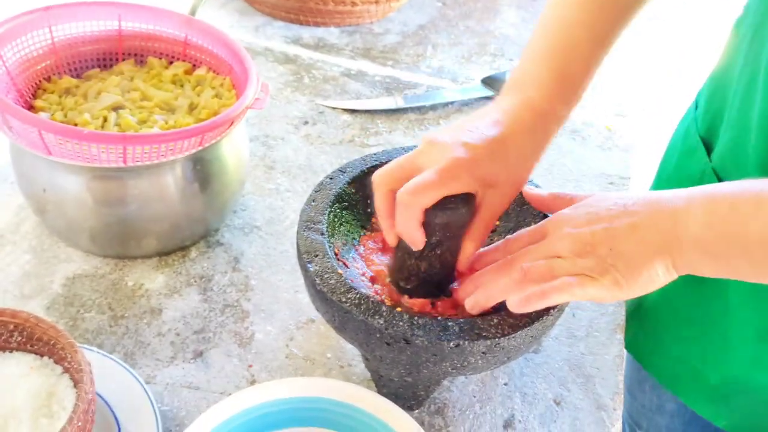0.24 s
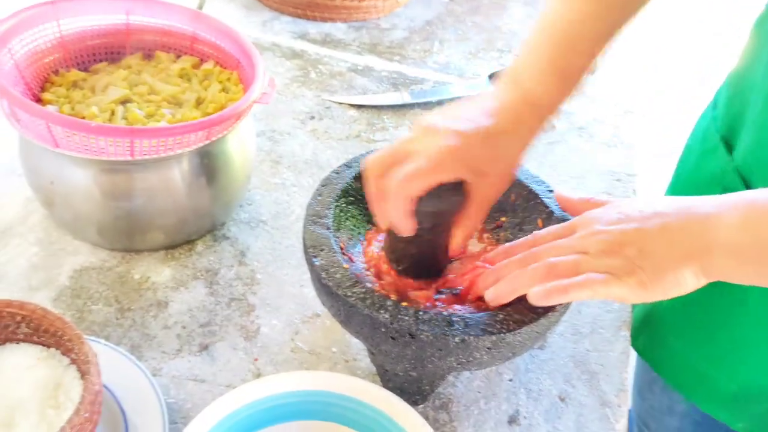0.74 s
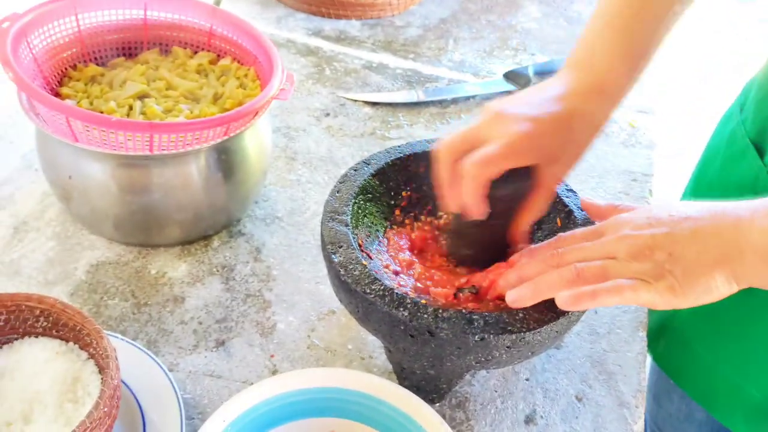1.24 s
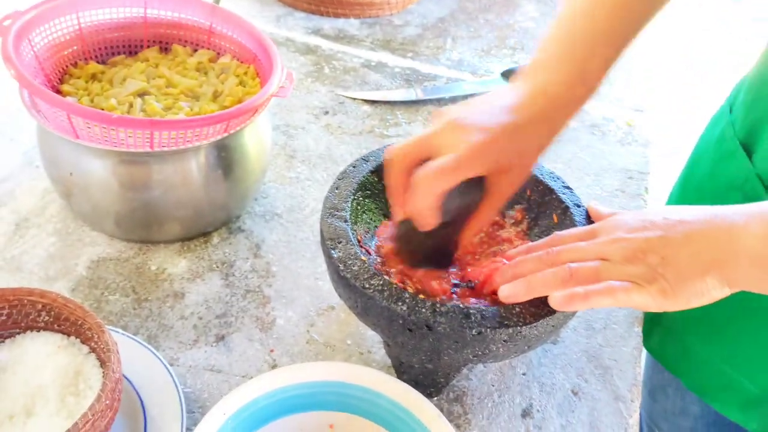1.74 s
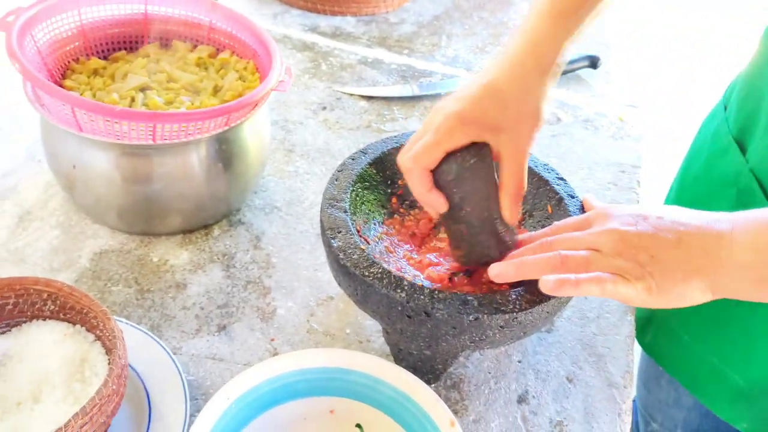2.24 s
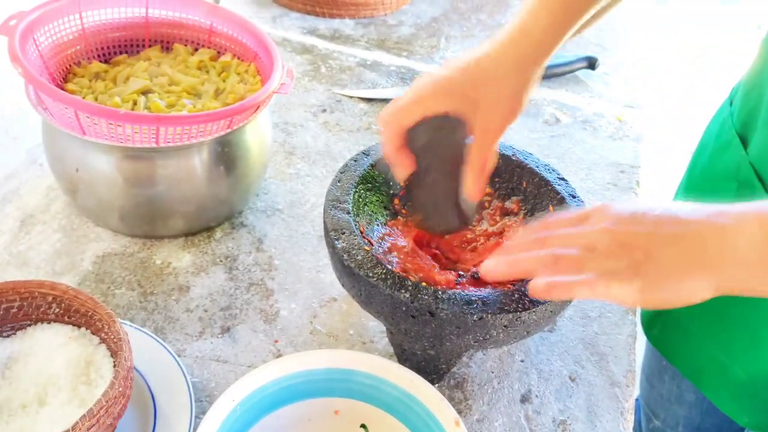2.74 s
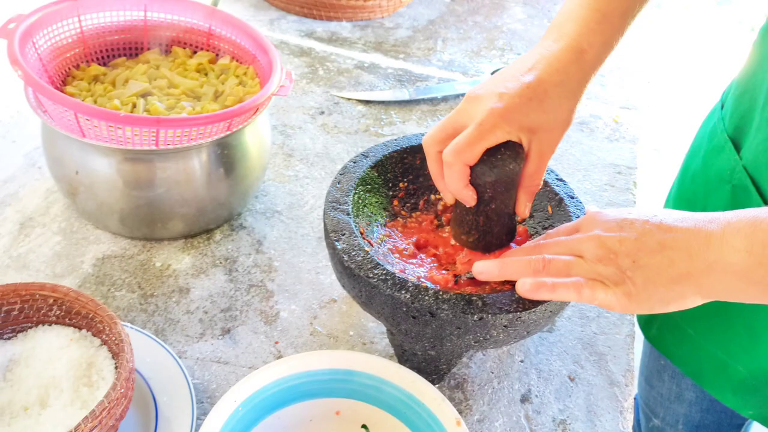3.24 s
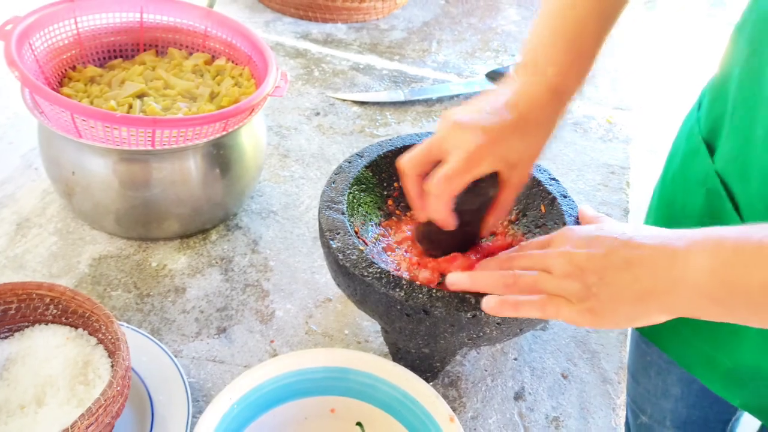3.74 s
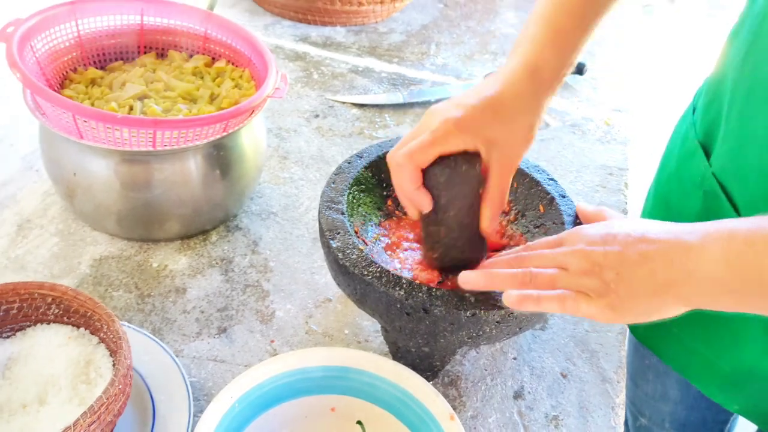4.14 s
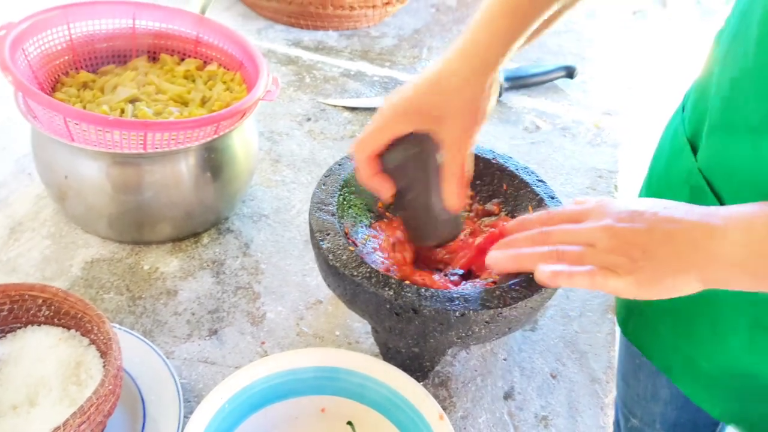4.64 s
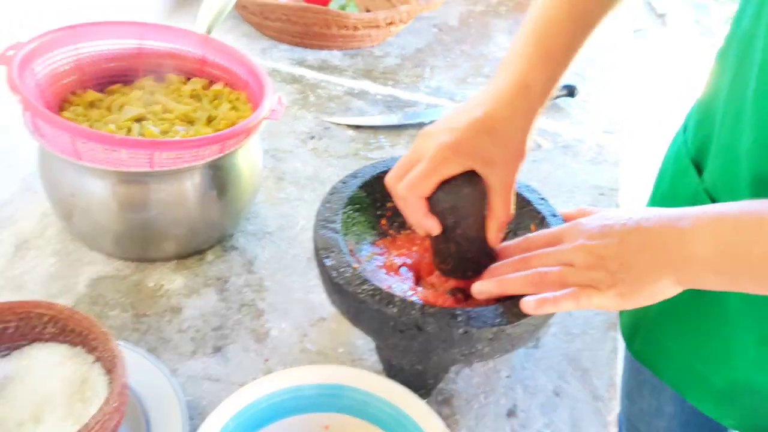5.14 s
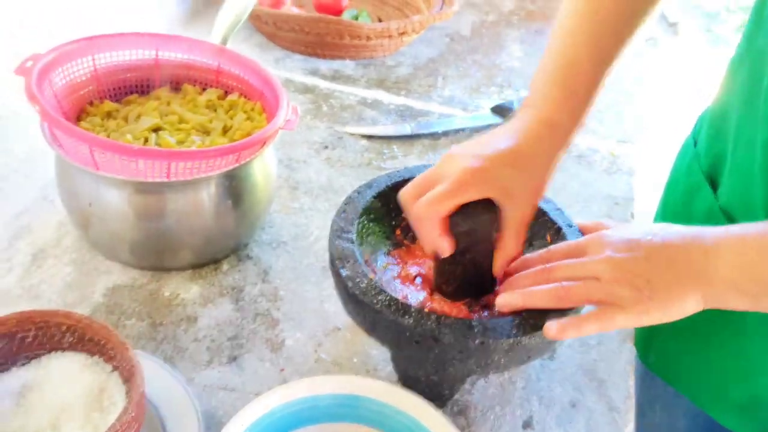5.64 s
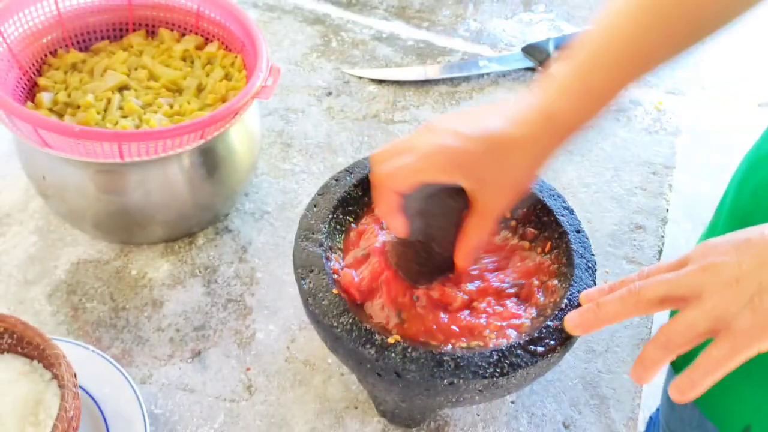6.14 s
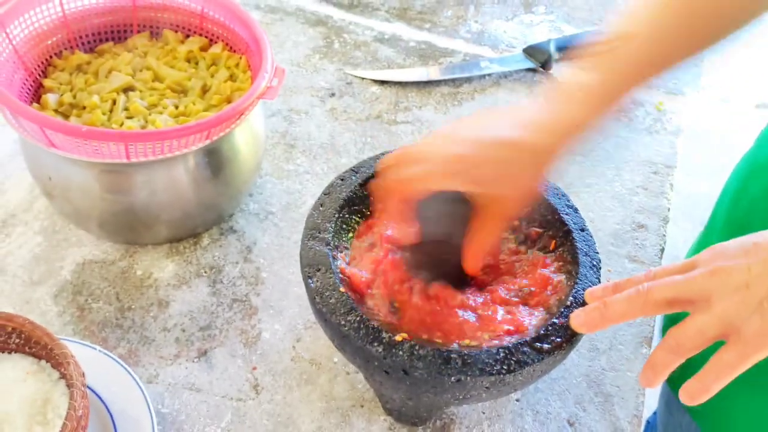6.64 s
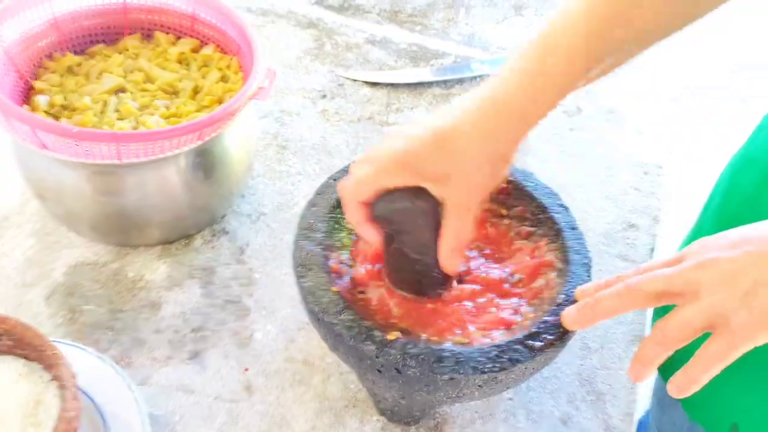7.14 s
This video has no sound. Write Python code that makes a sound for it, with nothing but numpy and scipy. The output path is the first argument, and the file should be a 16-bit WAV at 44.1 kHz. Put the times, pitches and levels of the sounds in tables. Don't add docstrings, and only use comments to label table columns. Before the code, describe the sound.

A stone pestle works soft tomato pulp in a rough stone bowl, heard from nearby in open air with only slight reflections. Quiet wet wiping opens, followed by irregular blows that thump the table and briefly ring the damped bowl, with grinding grit and bursting air pockets. A quieter stretch of fizzing and ticking holds one solid squelching push, before the loudest, hardest knocks and catching scrapes.

```python
import sys
import numpy as np
from scipy import signal
from scipy.io import wavfile

SR = 44100
rng = np.random.default_rng(int(sys.argv[2]) if len(sys.argv) > 2 else 0)


def generate_wav(sig):
    pcm = np.round(np.clip(np.atleast_2d(sig).T, -1, 1) * 32767).astype(np.int16)
    wavfile.write(sys.argv[1], SR, pcm)


def decibels_to_gain(level_db):
    exponent = np.asarray(level_db, float) / 20
    return 10 ** exponent


N = 325458

# f/Hz, density/dB per Hz
AIR_COLOUR = [(15, -45), (25, -21.5), (108, -2.5), (172, -13), (219, -18), (377, -21.5), (432, -21.5),
              (850, -25.5), (1680, -25), (3300, -33), (6160, -36.5), (11200, -38.5), (14700, -39),
              (16400, -61)]
AIR_DB = -56
# f/Hz, left-right likeness
AIR_LIKENESS = [(60, 0.56), (240, 0.29), (950, 0.072), (3770, -0.52), (15000, -0.15)]
# delay/s, level/dB
ECHOES = [(.0031, -11), (.0074, -8.5), (.013, -14.5), (.021, -14)]

# t/s, table rumble level/dB, fizz level/dB
WORK = [(0.0, -73, -62), (0.57, -56.5, -60.5), (1.03, -42, -53.5), (1.44, -51.5, -59), (1.95, -35.5, -55.5),
        (2.2, -49.5, -65), (2.75, -60.5, -64.5), (3.53, -74, -65.5), (3.8, -54, -63), (4.07, -61, -64.5),
        (5.38, -74, -66.5), (6.19, -41.5, -63), (6.84, -51.5, -65), (7.05, -40, -56.5), (7.38, -47, -83)]
# f/Hz, density/dB per Hz
FIZZ_COLOUR = [(1060, -55), (1800, 6), (3340, 3.5), (6380, 9.5), (7460, 5.5), (9060, -26), (11500, -26),
               (14900, 6), (16400, -7.5)]

# t/s, length/s, level/dB, tightness (pitch ratio)
WIPES = [
    (0.149, 1, -64.5, 0.73),
    (2.05, 0.18, -50.5, 1.57),
    (2.918, 0.34, -66, 1.1),
    (4.047, 0.52, -58.5, 1.03),
]
# f/Hz, level/dB, t60/s
SKIN_MODES = [(1080, -9, 0.0043), (1700, 6, 0.0052), (2280, 14.5, 0.0025), (2550, -13, 0.019)]

# t/s, peak level/dB, f/Hz, t60/s
POPS = [(0.258, -47, 1100, 0.021), (0.504, -46, 1700, 0.086), (0.81, -42, 1450, 0.018),
        (0.951, -34.5, 1300, 0.014), (1.089, -52, 920, 0.042), (2.411, -37.5, 1220, 0.016),
        (2.937, -49.5, 2460, 0.05), (3.607, -18.5, 1290, 0.013), (3.949, -44.5, 1310, 0.013),
        (4.162, -46, 2090, 0.03), (4.566, -47, 1270, 0.081), (5.066, -51, 1190, 0.014),
        (6.529, -34, 1180, 0.026)]
# t/s, peak level/dB, lowest f/Hz
SNAPS = [(0.7933, -22, 3000), (0.9337, -35, 3000), (0.949, -21, 3000), (1.004, -35, 3000),
         (1.036, -26.5, 3000), (1.0869, -41, 3000), (1.1047, -29, 3000), (1.2091, -33, 3000),
         (1.3785, -26, 3500), (1.6256, -32, 3000), (1.655, -16, 3000), (1.9723, -22, 3000),
         (2.4098, -44, 3000), (3.5917, -39, 3000), (3.6063, -23, 3000), (3.93, -37, 3000),
         (3.948, -36, 3000), (4.5644, -56, 3000), (5.0668, -56, 3000), (5.1117, -54, 3000),
         (5.9776, -47, 2980), (6.973, -32, 3030), (7.012, -35, 3000), (7.077, -21, 1500),
         (7.277, -27, 1300), (7.3267, -34, 1500)]
SNAP_DB, SNAP_T60_S = -6.5, 0.017

# t/s, peak level/dB, pocket f/Hz, pan/dB
SMACKS = [(0.236, -41.5, 4120, -7), (0.792, -24, 6460, -4), (0.811, -26.5, 7540, 11),
          (0.889, -40, 7290, -8), (1.004, -37.5, 5400, -5.5), (1.037, -37, 6800, 13),
          (1.057, -38, 6300, -12), (1.0876, -35.5, 5770, -13), (1.1043, -19.5, 6100, -6),
          (1.3778, -18, 4930, -7.5), (1.6555, -19.5, 6340, -10.5), (1.7674, -28, 6350, -2),
          (1.8133, -29.5, 5170, -10.5), (1.923, -30.5, 6200, -11), (1.973, -24.5, 6640, -2),
          (2.0522, -37, 5800, 1), (2.069, -24, 4560, -8), (2.41, -36.5, 5900, -10.5),
          (3.601, -39, 5000, -5), (3.608, -22, 4940, -8), (3.869, -36.5, 4750, -7), (3.948, -35, 7300, 14),
          (4.5656, -34, 4660, -10.5), (5.0675, -40, 3980, 15.5), (5.6128, -39, 5340, -9),
          (5.996, -21.5, 3330, 15), (6.9733, -30, 8200, -2.5), (7.078, -19, 6200, -6.5),
          (7.277, -23, 4230, -4), (7.328, -28, 6050, -7.5)]
SMACK_MIST_DB, MIST_PER_OCTAVE_DB = -8, 10
SMACK_T60_S, T60_PER_PAN_DB = 0.03, -0.0015
SKIN_CRACK = 4.2
# t/s, peak level/dB, pocket f/Hz
SQUIRTS = [(0.147, -50, 5200), (0.4965, -49, 5760), (0.9506, -32.5, 6100), (1.2229, -35, 4800),
           (1.232, -35, 5200), (1.5898, -40.5, 6200), (1.6288, -27.5, 5800), (1.679, -34.5, 5400),
           (2.301, -44, 5330), (2.9372, -48, 6470), (4.332, -39, 5800), (5.7254, -44, 5870),
           (5.837, -42.5, 5300), (7.01, -31, 4120)]
SQUIRT_MIST_DB, SQUIRT_T60_S, SQUIRT_PAN_DB = -4, 0.039, -8
# t/s, peak level/dB, pocket f/Hz
TICKS = [(0.166, -42, 6930), (0.4594, -42.5, 6200), (0.876, -45, 6270), (1.282, -43, 5730),
         (2.6448, -38.5, 5700), (2.6724, -42, 5450), (2.715, -44, 6400), (2.9741, -50, 5440),
         (3.069, -47, 6050), (3.4275, -48, 7120), (3.447, -43.5, 5400), (3.739, -48.5, 5440),
         (4.163, -39, 5850), (4.1949, -42.5, 6300), (4.5382, -45.5, 5800), (4.639, -46, 6450),
         (5.0967, -43, 5500), (5.3007, -44, 5940), (5.448, -42, 5500), (5.9778, -52, 5920),
         (6.228, -49, 5740)]
TICK_MIST_DB, TICK_T60_S, TICK_PAN_DB = -23, 0.04, -8

# f/Hz, level/dB, t60/s, pan/dB
BOWL_MODES = [(326, 2.5, 0.072, 17), (364, -0.5, 0.093, -42), (417.6, 2.5, 0.29, 4), (488.5, -6, 0.24, -9),
              (564, -2.5, 0.077, -19), (663, -5.5, 0.1, 16), (756, -6, 0.15, -11), (827, -3.5, 0.057, -17),
              (908, 5, 0.12, 4.5), (992, 2.5, 0.041, -2), (1123, 8.5, 0.032, 10), (1307, 3, 0.024, 10),
              (1482, 0.5, 0.016, 2.5), (1560, -0.5, 0.029, -6.5), (2000, -5.5, 0.0047, 5),
              (2380, -14, 0.028, 9)]
BOWL_RING = 0.49
HARD_LOW_LOSS = 0.34
# f/Hz, level/dB, t60/s, pan/dB
PESTLE_MODES = [(2973, -2.5, 0.062, -5), (3048, -4, 0.074, -4), (2667, -7, 0.014, 2), (2300, -8, 0.021, 3),
                (1960, -7, 0.015, 4.5)]
# f/Hz, level/dB, t60/s, pan/dB
PESTLE_OVERTONES = [(5800, 2, 0.029, -23.5), (6340, 4, 0.023, -15), (7010, -8, .025, -8),
                    (8330, -8, 0.035, 8), (10400, -13, 0.025, 1), (13070, -3, 0.014, -7),
                    (13700, -6, 0.023, -13)]

# t/s, peak level/dB, hardness/dB per octave
CATCHES = [(1.037, -41, 8), (1.209, -42, -6), (1.306, -37, 4), (1.319, -28, 2), (1.561, -17.5, 11),
           (1.619, -38, 6), (1.678, -31, 4), (1.741, -32, 6), (1.765, -21, 5), (1.782, -21.5, 8),
           (1.861, -33, 0), (2.035, -25, -3), (2.047, -30, 7), (2.077, -21, 6), (5.6, -49, -4),
           (5.708, -30, -7), (5.722, -32, -1), (5.75, -29, 0), (5.786, -44, -2), (6.013, -13.5, 1),
           (6.043, -18.5, 12), (6.084, -18.5, 3), (6.151, -35, 8), (6.229, -29, 4), (6.241, -38, 4),
           (6.35, -26, 2), (6.398, -17, 3), (6.413, -14.5, 2), (6.628, -38, 17), (6.655, -35, 7),
           (6.9, -27, 11), (6.916, -28, 2), (7.238, -27, 4), (7.279, -27, 8), (7.326, -21, 18),
           (7.373, -29, 4)]
CATCH_DB, CATCH_RING, CATCH_OVERTONES_DB = -4, 0.34, -35

# t/s, length/s, bowl level/dB, hardness/dB per octave, loose grip (pestle over bowl)/dB
STROKES = [(0.741, 0.16, -52.5, -5, -30), (0.934, 0.036, -48.5, -10, -30), (1.028, 0.086, -39.5, -1.5, -27),
           (1.2, 0.065, -57.5, 12.5, -13), (1.301, 0.084, -42.5, 1, -17), (1.539, 0.12, -33, -8.5, -12),
           (1.662, 0.048, -41.5, -3.5, -23), (1.74, 0.085, -33.5, -4, -22),
           (1.853, 0.062, -38.5, -11.5, -31), (1.913, 0.084, -34.5, -11, -22.5),
           (2.031, 0.085, -28.5, -4.5, -17.5), (2.116, 0.12, -52, -7.5, -8), (3.612, 0.1, -44.5, -7.5, -19),
           (5.586, 0.066, -53.5, 9, -11), (5.705, 0.12, -39.5, -1, -19), (6.011, 0.15, -35.5, -2, -8),
           (6.07, 0.027, -39, 9, -15), (6.143, 0.022, -32.5, -2, -23), (6.219, 0.046, -41, 2.5, -17),
           (6.349, 0.02, -45, -2, -25), (6.364, 0.026, -34, -4.5, -20), (6.389, 0.06, -33, -1, -21.5),
           (6.511, 0.033, -46, -10, -28), (6.62, 0.082, -45.5, -3.5, -23), (6.883, 0.072, -32.5, -3, -15),
           (6.973, 0.086, -43.5, -0.5, -28), (7.1, 0.096, -46.5, -3.5, -25), (7.215, 0.063, -36.5, 0, -23),
           (7.305, 0.056, -44, 3.5, -19), (7.343, 0.035, -40, 1.5, -21)]
PESTLE_EDGE_HZ = 3480
OVERTONES_DB, OVERTONES_PER_HARDNESS = -14, 0.53
COARSE_DB, COARSE_PER_HARDNESS = -14.5, 0.77
HARD_BLOW_DB, SKID_WITHIN_S, SKID_OVERTONES_DB = -17, 0.03, -5.5

# t/s, peak level/dB, pestle level/dB, pestle overtone level/dB, hardness/dB per octave
KNOCKS = [(1.528, -11.5, -16.5, -31.5, 4), (1.925, -24.5, -64, -49, -3), (5.996, -3, -24, -32, 10.5),
          (6.002, -40, -16.5, -61, -14), (6.146, -23, -59, -30.5, 4), (6.308, -29, -55, -69, 4),
          (6.373, -21, -65.5, -48, 4), (6.868, -14.5, -46, -38.5, 6.5), (6.978, -16.5, -44, -40, 5),
          (7.095, -17.5, -59, -55, 9), (7.226, -24.5, -67, -45, -3)]

# t/s, peak level/dB, pitch f/Hz, rocking level/dB, share of the table's free decay
THUDS = [(0.266, -45, 97, -4.5, 0.55), (0.35, -44, 121, -7, 0.44), (0.631, -27.5, 130, -10, 0.66),
         (0.836, -15.5, 127, -13, 0.54), (0.955, -22.5, 110, -17, 0.73), (1.035, -32, 95, -11, 1),
         (1.09, -28, 159, -9, .3), (1.128, -29.5, 90, -20, 0.62), (1.236, -24.5, 130, -12, 0.35),
         (1.323, -29, 144, -11, 0.79), (1.529, -17.5, 110, -3, 0.96), (1.61, -30, 110, 1, 0.36),
         (1.772, -27.5, 115, -8, 0.94), (1.863, -15.5, 113, -7, 0.61), (1.929, -21.5, 110, 0.5, 0.49),
         (1.999, -32, 100, -17, 0.61), (2.047, -22, 130, -4.5, 0.64), (2.129, -30.5, 160, 1, .9),
         (2.419, -26.5, 102, -15.5, 0.36), (3.618, -14.5, 114, -5.5, 0.68), (3.937, -39, 105, -27, 0.47),
         (4.327, -31, 105, -13.5, 0.43), (4.994, -50, 150, 4, .3), (5.343, -44.5, 119, -30, 0.34),
         (5.62, -32, 86, -10, 0.56), (5.75, -28, 131, -4, .5), (5.784, -22, 126, -12.5, .6),
         (5.814, -29.5, 116, -15, 0.72), (6.002, -14.5, 178, -29, 0.29), (6.059, -24, 171, -4, 0.43),
         (6.145, -25, 150, -8, .4), (6.29, -30.5, 110, -6, 0.62), (6.35, -25.5, 105, -3, 0.43),
         (6.622, -30, 99, -20, 0.44), (6.868, -18, 121, -6, 0.57), (6.981, -26.5, 123, -2, 0.81),
         (7.098, -18, 113, -13, 0.72), (7.229, -38, 120, 3, .8), (7.329, -34, 120, -0.5, 0.75)]
# f/Hz, level/dB, t60/s
TABLE_MODES = [(86, 5.5, 0.74), (110, 14.5, 0.51), (144.6, 15, 0.27), (176, 10, 0.25)]
# f/Hz, level/dB, t60/s
FEET_MODES = [(215, -9.5, 0.4), (267.1, -6.5, 0.37), (309, -10, 0.19), (359, 1, 0.1), (412.6, 0, 0.22),
              (486, 5.5, 0.05), (596, -7, 0.17)]


def rms_one(x):
    return x / np.sqrt(np.mean(x ** 2) + 1e-20)


def peak_one(x):
    return x / np.abs(x).max()


def clock(seconds):
    return np.arange(round(seconds * SR)) / SR


def in_time(rows):
    s, *columns = np.transpose(rows)
    return [np.interp(np.arange(N) / SR, s, c) for c in columns]


def at_hz(points, hz):
    points = np.array(points)
    return np.interp(np.log(hz), np.log(points[:, 0]), points[:, 1])


def sides(pan_db):
    return decibels_to_gain(np.array([[pan_db], [-pan_db]]) / 2)


def dull(x, cut_hz):
    return signal.sosfilt(signal.butter(2, cut_hz, fs=SR, output="sos"), x)


def cut_lows(x, cut_hz):
    return signal.sosfilt(signal.butter(4, cut_hz, "high", fs=SR, output="sos"), x)


def drift(rate):
    r = np.exp(-80 * np.pi * rate / SR)
    slow = signal.lfilter([1], [1, -2 * r, r * r], rng.standard_normal(N // 40 + 2002))[2000:]
    return np.interp(np.arange(N) / 40, np.arange(len(slow)), rms_one(slow))


def ring(force, hz, t60):
    r, w = decibels_to_gain(-60 / (t60 * SR)), 2 * np.pi * hz / SR
    return signal.lfilter([0, np.sin(w)], [1, -2 * r * np.cos(w), r * r], force + 1e-18)


def ring_all(modes, force, pitch=1, lasting=1):
    return sum(decibels_to_gain(db) * ring(force, hz * pitch, t60 * lasting) for hz, db, t60 in modes)


def add(out, s, piece):
    i = round(s * SR)
    out[:, i:i + piece.shape[1]] += piece[:, :N - i]


def grit(shape, density, spread_db):
    sizes = decibels_to_gain(spread_db * np.minimum(rng.exponential(1, shape), 4))
    sizes = sizes * rng.choice([-1, 1], shape)
    return rms_one(sizes * (rng.random(shape) < density / SR))


def hump(t, length):
    x = np.clip(t / length, 0, 1.25) / 1.25
    return np.sin(np.pi * x ** .5) ** 1.5


def banded(spectrum, white, likeness, patchy_db):
    out, edges = 0, 25 * 2 ** np.arange(0, 9.6, .5)
    for k, (low, high) in enumerate(zip(edges, edges[1:])):
        hz = np.sqrt(low * high)
        if hz > spectrum[0][0]:
            band = signal.butter(2, [low, high], "band", fs=SR, output="sos")
            mid, side = signal.sosfilt(band, white[k % 2])
            alike = at_hz(likeness, hz)
            gain = decibels_to_gain(at_hz(spectrum, hz) + patchy_db * drift(5.7))
            out = out + gain * (np.sqrt(1 + alike) * mid + np.sqrt(1 - alike) * side * [[1], [-1]])
    return rms_one(out)


def struck(modes, force, shares_db, lasting):
    shares_db = shares_db + np.zeros(len(BOWL_MODES))
    out = 0
    for k, (hz, db, t60, pan) in enumerate(modes):
        tone = decibels_to_gain(db + shares_db[k]) * ring(force, hz, t60 * lasting)
        out = out + (-1) ** k * tone * sides(pan * min(hz / 2000, 1))
    return out


def tilted(tilt_db):
    octaves = np.log2(np.array(BOWL_MODES)[:, 0] / 700)
    return tilt_db * octaves + HARD_LOW_LOSS * max(tilt_db + 2.0, 0) * np.minimum(octaves, 0)


def open_air():
    return decibels_to_gain(AIR_DB) * banded(AIR_COLOUR, rng.standard_normal((2, 2, N)), AIR_LIKENESS, patchy_db=.6)


def surroundings(x):
    out, soft = x.copy(), dull(cut_lows(x, 456), 3640)
    for s, db in ECHOES:
        for ear, stretch in enumerate((1, 1.3)):
            lag = round(s * stretch * SR)
            out[ear, lag:] += decibels_to_gain(db) * soft[1 - ear, :-lag]
    return out


def rumble(level_db):
    shake = grit(N, density=150, spread_db=2.0)
    return decibels_to_gain(level_db + 3.5) * rms_one(ring_all(TABLE_MODES, shake, lasting=0.22))


def fizz(level_db):
    crackle = grit((2, 2, N), density=2500, spread_db=2.0)
    wet = banded(FIZZ_COLOUR, crackle, [(2000, .6), (14000, .3)], patchy_db=1.4)
    spurt_db = np.clip(.6 * (level_db + 64), .8, 6) * (drift(25) - .3)
    return decibels_to_gain(level_db - 2.0) * wet * sides(-4) * decibels_to_gain(spurt_db)


def wipes():
    out, t = np.zeros((2, N)), clock(.7)
    grains = grit((len(WIPES), 2, len(t)), density=5200, spread_db=3.5)
    for (s, length, level_db, tightness), grain in zip(WIPES, grains):
        rub = ring_all(SKIN_MODES, grain, pitch=tightness)
        add(out, s, decibels_to_gain(level_db) * rms_one(cut_lows(rub, 750)) * hump(t, length))
    return out


def pops():
    out, t = np.zeros((2, N)), clock(.1)
    for (s, peak_db, hz, t60), noise in zip(POPS, rng.standard_normal((len(POPS), len(t)))):
        burst = noise * decibels_to_gain(-60 * t / t60) + 6.7 * (t == 0)
        wave = ring(burst, hz, 0.0041) + 0.34 * ring(burst, 0.77 * hz, 0.005)
        wave += .12 * ring(burst, 1.8 * hz, 0.0013)
        hollow = dull(dull(cut_lows(wave, 0.9 * hz), 1.6 * hz), 1.6 * hz)
        add(out, s, decibels_to_gain(peak_db) * peak_one(hollow) * sides(1.9))
    return out


def snaps():
    out, t = np.zeros((2, N)), clock(.03)
    for (s, peak_db, low_hz), noise in zip(SNAPS, rng.standard_normal((len(SNAPS), 2, len(t)))):
        click = (noise + 0.62 * noise[0]) * decibels_to_gain(-60 * t / SNAP_T60_S)
        add(out, s, decibels_to_gain(peak_db + SNAP_DB) * peak_one(cut_lows(click, low_hz)) * sides(-2.5))
    return out


def pockets():
    rows = []
    for s, db, hz, pan in SMACKS:
        mist_db = SMACK_MIST_DB + MIST_PER_OCTAVE_DB * np.log2(hz / 6000)
        rows.append((s, db, hz, mist_db, SMACK_T60_S + T60_PER_PAN_DB * pan, pan))
    rows += [(*row, SQUIRT_MIST_DB, SQUIRT_T60_S, SQUIRT_PAN_DB) for row in SQUIRTS]
    return rows + [(*row, TICK_MIST_DB, TICK_T60_S, TICK_PAN_DB) for row in TICKS]


def smacks():
    out, t = np.zeros((2, N)), clock(.1)
    bursts = pockets()
    sprays = grit((len(bursts), 2, len(t)), density=6000, spread_db=4.0)
    for (s, peak_db, hz, mist_db, t60, pan_db), noise in zip(bursts, sprays):
        fade = decibels_to_gain(-60 * t / t60) + 0.047 * decibels_to_gain(-60 * t / 0.24)
        spray = (0.069 * noise[0] + 2.7 * noise) * fade * np.minimum(t / 0.00014, 1)
        spray += SKIN_CRACK * (t == 0)
        cavity = ring(spray, hz, 0.0024) + 0.3 * ring(spray, 1.205 * hz, 0.002)
        cavity += 0.08 * ring(spray, 0.77 * hz, 0.00073)
        mist = peak_one(cut_lows(spray, 7000) + 0.099 * ring(spray, 11700, 0.00204))
        mist = decibels_to_gain(mist_db + 9.0) * mist * sides(-.6 * pan_db)
        add(out, s, decibels_to_gain(peak_db) * (peak_one(cut_lows(cavity, 0.52 * hz)) + mist) * sides(pan_db))
    return out


def catches():
    out, t = np.zeros((2, N)), clock(.08)
    chance = rng.normal(0, 2.5, (len(CATCHES), len(BOWL_MODES)))
    rough = rng.standard_normal((len(CATCHES), len(t)))
    for (s, peak_db, tilt_db), luck, noise in zip(CATCHES, chance, rough):
        contact = (t == 0) + 0.44 * noise * decibels_to_gain(-60 * t / 0.0066)
        soft = dull(dull(contact, 1700), 3000)
        bowl = peak_one(struck(BOWL_MODES, soft, luck + tilted(tilt_db), CATCH_RING))
        top = peak_one(struck(PESTLE_OVERTONES, contact, 0, 0.7))
        top = decibels_to_gain(CATCH_OVERTONES_DB + 0.7 * tilt_db) * top
        add(out, s, decibels_to_gain(peak_db + CATCH_DB) * (bowl + top))
    return out


def skidding(s):
    return any(0 < s - blow[0] < SKID_WITHIN_S and blow[1] > HARD_BLOW_DB for blow in KNOCKS)


def grinding():
    out, t = np.zeros((2, N)), clock(.24)
    edge = signal.cheby2(8, 40, PESTLE_EDGE_HZ, fs=SR, output="sos")
    grains = grit((len(STROKES), len(t)), density=900, spread_db=4.5)
    chance = rng.normal(0, 1.5, (len(STROKES), len(BOWL_MODES)))
    for (s, length, bowl_db, tilt_db, loose_db), grain, luck in zip(STROKES, grains, chance):
        top_db = bowl_db + OVERTONES_DB + OVERTONES_PER_HARDNESS * tilt_db
        top_db += SKID_OVERTONES_DB * skidding(s)
        coarse_db = bowl_db + COARSE_DB + COARSE_PER_HARDNESS * tilt_db
        force = grain * hump(t, length)
        bowl = struck(BOWL_MODES, dull(dull(force, 2100), 2300), luck + tilted(tilt_db), 0.61)
        pestle = struck(PESTLE_MODES, force, 0, 0.69) + 0.15 * cut_lows(force, 1700)
        top = struck(PESTLE_OVERTONES, force, 3.1 * luck, 0.85)
        fine = dull(cut_lows(force, 3100), 5800)
        coarse = dull(dull(dull(cut_lows(force, 980), 1780), 2000), 2200)
        wave = decibels_to_gain(bowl_db - 2.0) * rms_one(bowl)
        wave += decibels_to_gain(bowl_db + loose_db - 7.0) * rms_one(signal.sosfilt(edge, pestle))
        wave += decibels_to_gain(top_db - 5.0) * rms_one(top)
        wave += decibels_to_gain(top_db - 17.0) * rms_one(fine) * sides(-13.0)
        wave += decibels_to_gain(coarse_db) * rms_one(coarse) * sides(-1.1)
        add(out, s, wave / np.sqrt(t[-1] / length))
    return out


def knocks():
    out, t = np.zeros((2, N)), clock(.25)
    chance = rng.normal(0, 1.5, (len(KNOCKS), len(BOWL_MODES)))
    rough = rng.standard_normal((len(KNOCKS), len(t)))
    for (s, peak_db, pestle_db, top_db, tilt_db), luck, noise in zip(KNOCKS, chance, rough):
        contact = (t == 0) + 0.24 * noise * decibels_to_gain(-60 * t / 0.015)
        soft = dull(dull(contact, 1320), 3400)
        wave = decibels_to_gain(peak_db) * peak_one(struck(BOWL_MODES, soft, luck + tilted(tilt_db), BOWL_RING))
        wave += decibels_to_gain(pestle_db) * peak_one(struck(PESTLE_MODES, contact, 0, 0.74))
        wave += decibels_to_gain(top_db) * peak_one(struck(PESTLE_OVERTONES, contact, 0, 1.0))
        add(out, s, wave)
    return out


def thuds():
    out, t = np.zeros((2, N)), clock(.4)
    jolt = np.sin(np.pi * t / .0018) * (t < .0018)
    feet = peak_one(ring_all(FEET_MODES, jolt, lasting=0.91))
    for s, peak_db, pitch_hz, rock_db, lasting in THUDS:
        push = np.sin(2 * np.pi * pitch_hz * t) * (t < 1 / pitch_hz)
        table = peak_one(ring_all(TABLE_MODES, push, lasting=lasting))
        add(out, s, decibels_to_gain(peak_db) * (table + decibels_to_gain(rock_db + 1.5) * feet) * sides(2.55))
    return out


def scene():
    rumble_db, fizz_db = in_time(WORK)
    air = open_air()
    wet = fizz(fizz_db) + wipes()
    near = pops() + snaps() + smacks() + catches() + grinding() + knocks()
    table = cut_lows(thuds() + rumble(rumble_db), 79.8)
    return cut_lows(surroundings(near), 155.0) + table + wet + air


def low_pass(x):
    return signal.sosfilt(signal.butter(12, 15900, fs=SR, output="sos"), x)


def record(dry):
    rounded = .55 * np.tanh(dry / .55)
    treble_cut = signal.cheby2(8, 40, 16400, fs=SR, output="sos")
    return low_pass(signal.sosfilt(treble_cut, rounded))


dry = scene()
out = record(dry)
generate_wav(out)
```